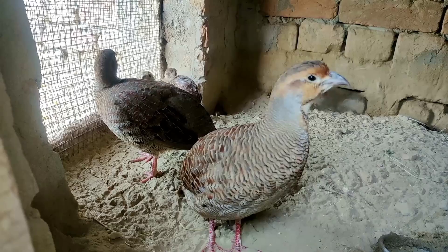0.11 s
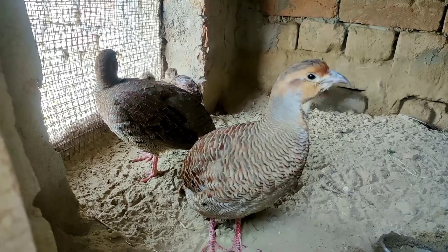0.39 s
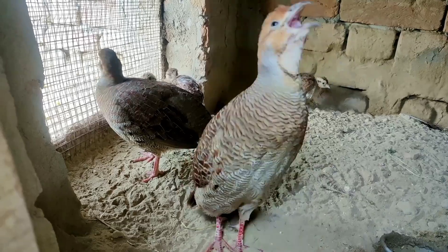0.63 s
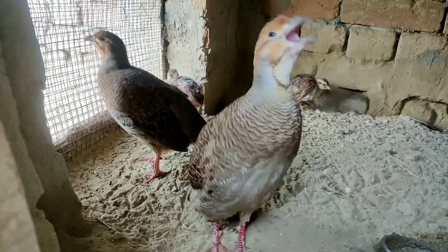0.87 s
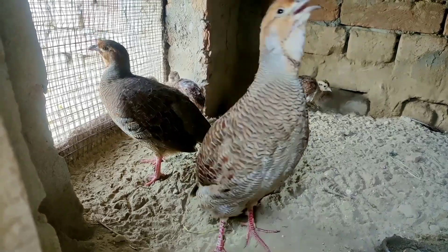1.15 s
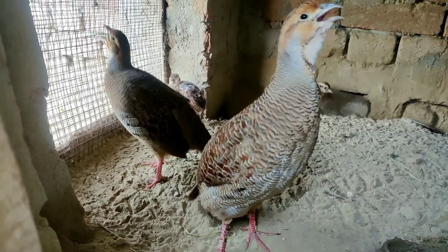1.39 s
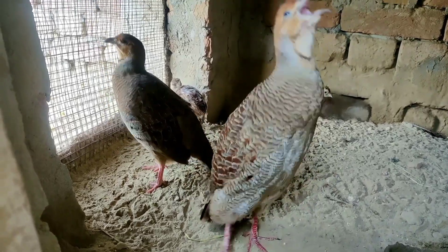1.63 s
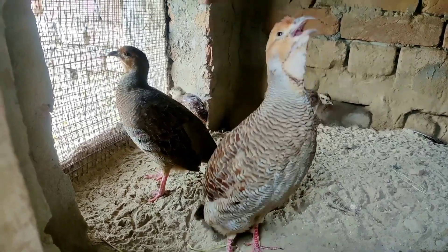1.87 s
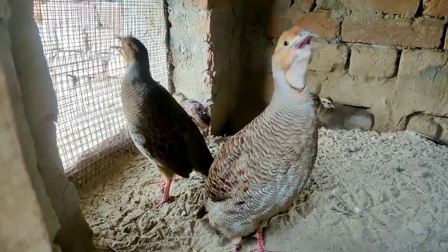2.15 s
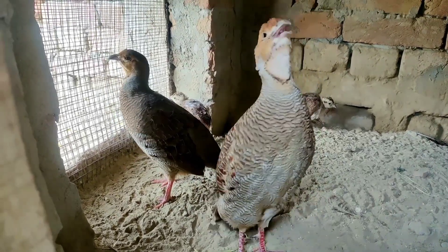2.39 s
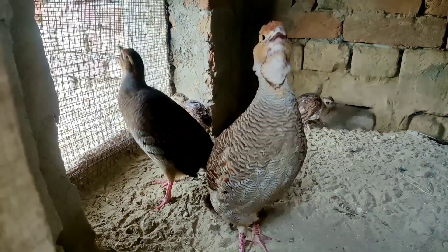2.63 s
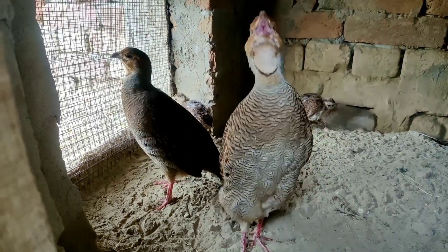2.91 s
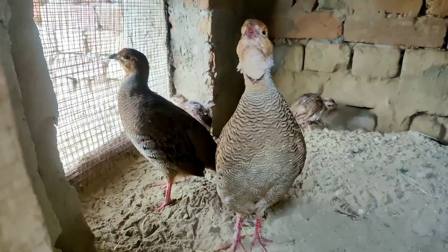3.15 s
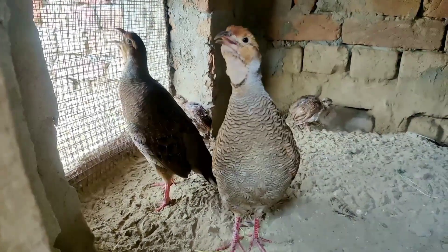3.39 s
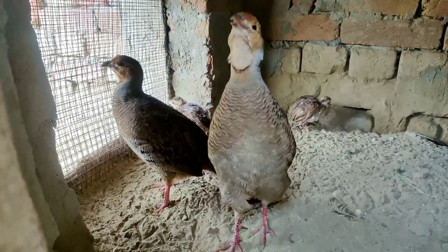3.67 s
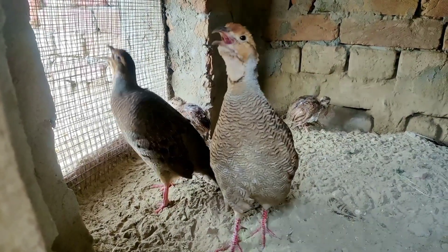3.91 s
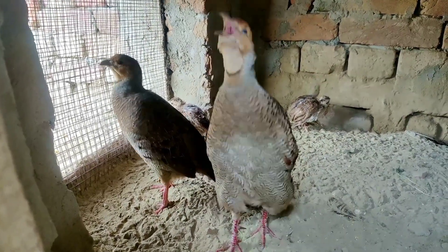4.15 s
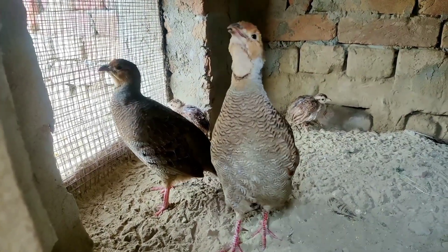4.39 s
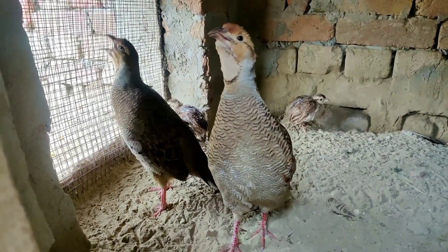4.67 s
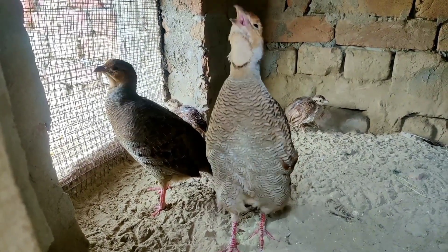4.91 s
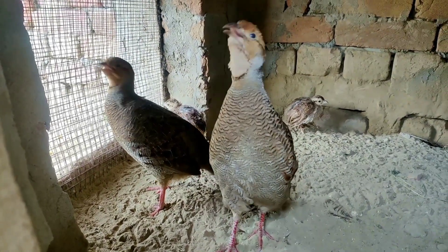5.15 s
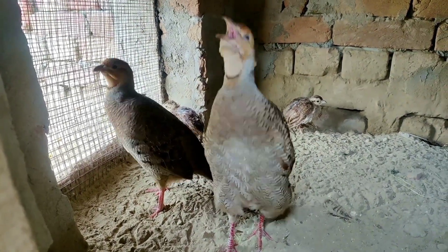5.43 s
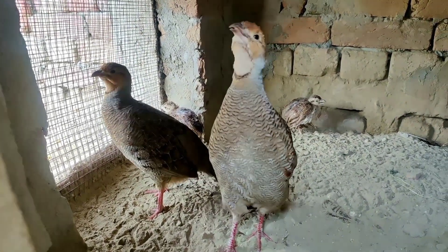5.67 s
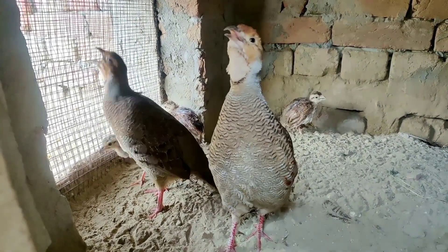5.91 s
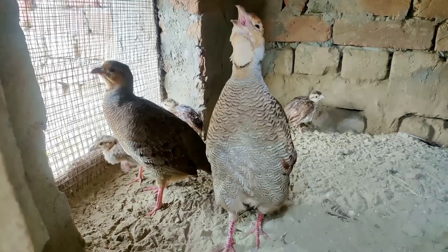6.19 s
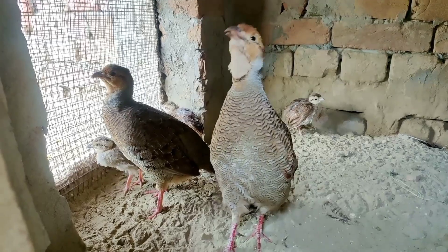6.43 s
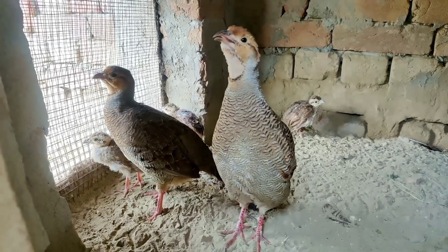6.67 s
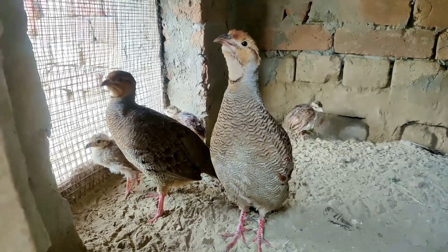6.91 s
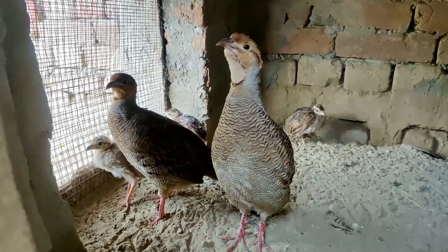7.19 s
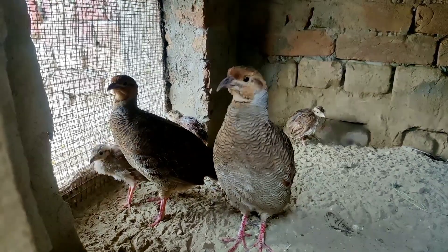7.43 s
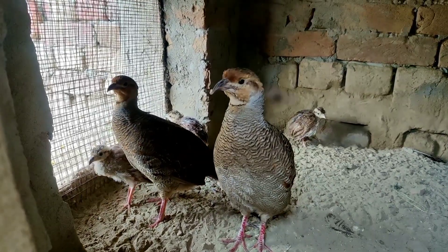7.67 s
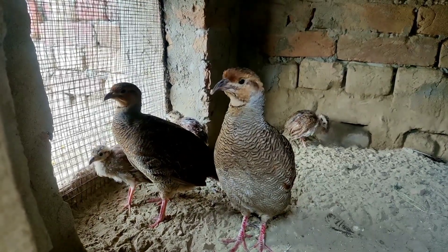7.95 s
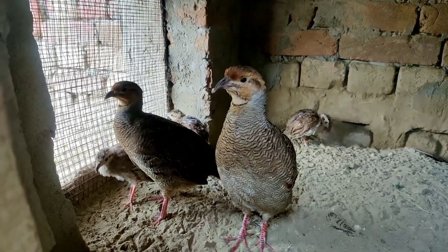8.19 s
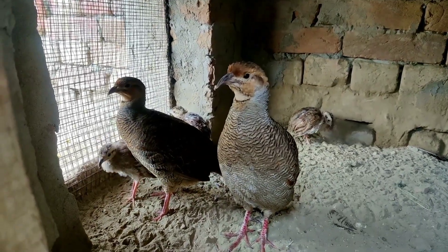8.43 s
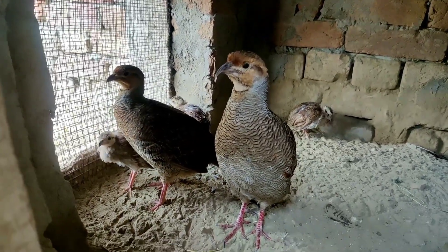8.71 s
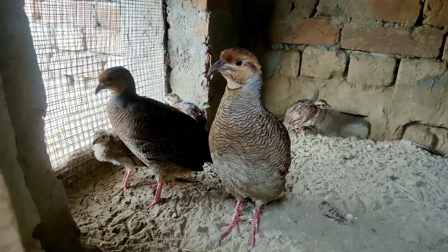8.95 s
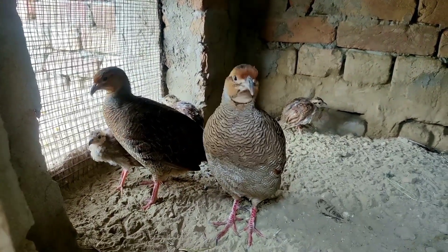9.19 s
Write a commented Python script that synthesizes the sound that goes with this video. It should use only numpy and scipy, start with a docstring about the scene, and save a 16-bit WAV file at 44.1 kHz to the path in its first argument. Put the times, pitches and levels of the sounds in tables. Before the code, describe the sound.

A faint peep and sandy scuff over low hum, then a rough squeal launches two partridge-like birds into a loud, close duet. Raspy double clucks, a thin steady whistle and a harsh two-part yelp cycle about every two-thirds of a second. They stop abruptly before seven seconds; quiet hum, weak peeps, foot knocks and a distant bleat remain. Small brick pen, short hard echo, close microphone.

```python
"""Two game birds duet close by in a brick pen: one clucks, the other squeals, whistles and yelps. Each voice is
gliding sines with overtones or a stack of partials; chaotic pulses and breath make the rasp that locks into tones.
Peeps (one early, the rest late) are gliding sines, feet are decaying sines and filtered noise, a far animal's
bleat is a quavering stack of partials, low thumps under the yelps are filtered gates. A machine's hum and low
rumble sink under the calls, then creep back."""
import sys
import numpy as np
from scipy import signal
from scipy.fft import rfft, irfft, next_fast_len
from scipy.io import wavfile
from scipy.ndimage import uniform_filter1d, map_coordinates

SR = 44100
rng = np.random.default_rng(int(sys.argv[2]) if len(sys.argv) > 2 else 0)


def store_pcm(level_fs):
    """Save levels as 16-bit WAV."""
    pcm = np.round(np.clip(level_fs, -1, 1) * 32767).astype(np.int16)
    wavfile.write(sys.argv[1], SR, np.atleast_2d(pcm).T)


def gain_from_db(level_db):
    """Turn a decibel level (scalar or array-like) into a linear amplitude factor."""
    decades = np.asarray(level_db, float) / 20
    return 10 ** decades


N = 411012


def unit(x):
    """Scales to rms 1."""
    return x / np.sqrt(np.mean(x ** 2) + 1e-20)


def along(points, hz):
    """Interpolates (f/Hz, value) points on a log frequency axis."""
    f, v = np.transpose(points)
    return np.interp(np.log(hz + 1), np.log(f + 1), v)


def wobble(rate_hz):
    """Smooth random curve, rate_hz knots a second."""
    return map_coordinates(rng.standard_normal(int(N * rate_hz / SR) + 4), [np.arange(N) * rate_hz / SR])


def filtered(x, response):
    """Multiplies the spectrum by a complex response of frequency."""
    m = next_fast_len(N + 8192)
    return irfft(rfft(x, m) * response(np.fft.rfftfreq(m, 1 / SR)), m)[..., :N]


def throat(modes):
    """Causal sum of resonances of alternating sign; modes: f/Hz, width/Hz, level/dB."""
    def response(f):
        total = 0
        for k, (center, width, db) in enumerate(modes):
            total = total + (-1) ** k * gain_from_db(db) * 1j * f * width / (center * center - f * f + 1j * f * width)
        return total
    return response


def gate(rows, lead_s, lag_s, edge_s):
    """1 while the rows (t/s, length/s, ..) sound, with soft edges."""
    on = np.zeros(N)
    for s, length, *_ in rows:
        on[round((s - lead_s) * SR):round((s + length + lag_s) * SR)] = 1
    return uniform_filter1d(on, max(int(edge_s * SR), 1))


# the pen throws each pitch to one side: f/Hz, left over right/dB
LEAN = [(1420, 5), (1650, -3.5), (1760, -13), (2070, -14), (2330, -6.5)]
# as the birds turn: t/s, share of the lean, left over right/dB
FACING = [(.5, .2, -1), (1.701, 0.27, -1), (2.3, 0.89, -1), (4, 1, 4), (6.2, 0.8, 4.5), (6.6, .4, -0.5)]


def tones(rows, over_db, attack_s, release_s, bend, jitter_hz, swell_db, fade_db):
    """Gliding sines with overtones (t/s, length/s, start f/Hz, end f/Hz, level/dB); the first partial leans sideways."""
    out, shake_hz = np.zeros((2, N)), jitter_hz * wobble(300)
    flicker = np.array([wobble(70), wobble(70)])
    when, share, side_db = np.transpose(FACING)
    for s, length, start_hz, end_hz, db in rows:
        t = np.arange(-attack_s, length + 4 * release_s, 1 / SR)
        i = round((s - attack_s) * SR) + np.arange(len(t))
        hz = start_hz + (end_hz - start_hz) * np.clip(t / length, 0, 1.3) ** bend
        phase = 2 * np.pi * np.cumsum(hz + shake_hz[i]) / SR
        shape = np.clip((t + attack_s) / (2 * attack_s), 0, 1) ** 2
        shape *= np.exp(-np.maximum(t - length + release_s, 0) / release_s)
        shape *= gain_from_db(-swell_db * np.exp(-np.maximum(t, 0) / 0.053))  # positive: grows while held
        # positive fade_db: overtones thin out as the pitch falls, the high ones most
        fade_by_db = fade_db * (start_hz - hz) / 400
        draw = rng.standard_normal((len(over_db) + 1, 4))
        ratio = gain_from_db(along(LEAN, hz) * np.interp(s, when, share) + np.interp(s, when, side_db))
        sides = np.array([ratio, ratio ** 0]) * np.sqrt(2 / (1 + ratio ** 2))
        wave = sides * np.sin(phase + [[-.5], [.5]])  # right leads in phase
        for k, level_db in enumerate(over_db):
            overtone_db = level_db - (k + 1) * fade_by_db + 2 * flicker[:, i] + 3 * draw[k + 1, :2, None]
            wave += gain_from_db(overtone_db) * np.sin((k + 2) * phase + np.pi * draw[k + 1, 2:, None])
        out[:, i] += gain_from_db(db) * np.sqrt(2) * shape * wave
    return out


# resonances that lift nearby partials: f/Hz, width/Hz; the upper one also level/dB
RING = (1700, 300)
UPPER_RING = (5300, 1100, 7.7)
QUAVER_HZ = 74


def stack(curve, partial_db, jitter_hz, rough, breath_db, breath_hz, ring_db, tremble):
    """Harmonic voice on a pitch curve, with random flutter, breath and a fast quaver of pitch and level."""
    s, hz, db = np.transpose(curve)
    t = np.arange(N) / SR
    pitch_hz = np.interp(t, s, hz)
    quaver = np.sin(2 * np.pi * QUAVER_HZ * t + wobble(20))
    phase = 2 * np.pi * np.cumsum(pitch_hz * (1 + tremble * quaver) + jitter_hz * wobble(150)) / SR
    clean = np.zeros(N)
    for number, level_db in enumerate(partial_db, 1):
        f = number * pitch_hz
        lift_db = ring_db * np.exp(-((f - RING[0]) / RING[1]) ** 2)
        lift_db += UPPER_RING[2] * np.exp(-((f - UPPER_RING[0]) / UPPER_RING[1]) ** 2)
        clean += gain_from_db(level_db + lift_db) / (1 + (f / 7900) ** 20) * np.sin(number * phase)
    flutter = np.array([wobble(980), wobble(900)])
    voiced = unit(clean) * (1 + rough * flutter) * (1 + 4 * tremble * quaver)
    noise = rng.standard_normal((2, N))
    breath = unit(filtered(noise, lambda f: f / (f + 2500) / (1 + (f / breath_hz) ** 4)))
    return (voiced + gain_from_db(breath_db) * breath) * gain_from_db(np.interp(t, s, db, -120, -120))


# background: t/s, level/dB
GROUND = [(.45, -42.5), (1.05, -55), (6.5, -60), (8.91, -51.5), (9.3, -48.5)]
# spectrum of rumble and hiss: f/Hz, relative level/dB per Hz
AIR = [(25, -5), (55, -15), (80, -21), (400, -25.5), (1000, -40.5), (3000, -44.5), (15000, -64.5)]
# hum partials: f/Hz, level/dB
HUM = [(43, 0), (129, -10), (254, -12)]
# f/Hz, left-right likeness
ALIKE = [(240, 0.93), (2000, 0.24)]


def background():
    """Shaped noise for rumble and hiss, wavering sines for the hum, on one level curve."""
    now = np.arange(N) / SR

    def spread(hz):
        angle = np.arccos(np.clip(along(ALIKE, hz), -1, 1)) / 2
        return gain_from_db(along(AIR, hz)) * [np.cos(angle), np.sin(angle)]
    mid, side = filtered(rng.standard_normal((2, N)), spread)
    hum = np.zeros(N)
    for hz, db in HUM:
        hum += gain_from_db(db + 2.2 * wobble(6.1)) * np.sin(2 * np.pi * hz * now + 0.41 * wobble(22.0))
    level = gain_from_db(np.interp(now, *np.transpose(GROUND)) + 2.2 * wobble(18.0))
    return level * (gain_from_db(2.0) * unit(np.array([mid + side, mid - side])) + hum)


# t/s, length/s, start f/Hz, end f/Hz, level/dB
PEEPS = [(7.865, 0.037, 2597, 2300, -67), (8.215, 0.06, 6500, 4570, -71), (8.33, .03, 6900, 6000, -66),
         (.145, .06, 5200, 3400, -56), (8.872, .018, 3250, 3000, -68)]


def chicks():
    """Peeps: short falling sines without overtones."""
    return tones(PEEPS, [], attack_s=.004, release_s=.005, bend=0.88, jitter_hz=90, swell_db=0.5, fade_db=0)


# middle t/s, length/s, level/dB
SCUFFS = [(0.186, 0.066, -58), (8.381, .07, -57.5), (8.696, 0.085, -65)]


def scuffs():
    """Feet in sand: resonant grainy noise under smooth humps."""
    now = np.arange(N) / SR
    grains = rng.standard_normal((2, N)) * gain_from_db(1.1 * wobble(260))
    sand = unit(filtered(grains, lambda f: throat([(2800, 3500, 0)])(f) ** 2))
    return sand * sum(gain_from_db(db) * np.exp(-(2 * (now - s) / length) ** 4) for s, length, db in SCUFFS)


# t/s, pitch f/Hz, level/dB
SQUEAL = [(0.224, 1040, -35.5), (0.273, 1369, -15.5), (0.332, 1158, -20), (0.365, 1282, -15),
          (0.372, 1725, -16), (0.384, 1887, -13), (.397, 1643, -15), (0.403, 1200, -19), (.43, 643, -35.5)]
# partials 1, 2, ..: level/dB
SQUEAL_DB = [-22.5, -9.5, -9.5, -9, -10, -10.5]


def squeal():
    """One harmonic voice that leaps in pitch, slightly rough and breathy."""
    return stack(SQUEAL, SQUEAL_DB, jitter_hz=11, rough=0.15, breath_db=-14.5, breath_hz=14000,
                 ring_db=12.0, tremble=0)


# rasps with no cluck or yelp of their own: t/s, level/dB
RASPS = [(0.392, -28), (0.677, -27.5)]
CLUCK_RASP_DB, HOARSE = -18, .5  # under the tone; dB of rasp gained per dB a cluck falls under -10.5
CLUCK_OPENS_DB, YELP_OPENS_DB = -15, 6  # a cluck's rasp opens soft and grows, a yelp's bursts and settles


def rasp_openings():
    """Rasp of every syllable in time order: t/s, level/dB, first level over that/dB."""
    own = [(s, db, 0) for s, db in RASPS]
    yelping = [(s, db, YELP_OPENS_DB) for s, _, db, *_ in YELPS]
    clucking = [(s, db + CLUCK_RASP_DB + HOARSE * max(-10.5 - db, 0), CLUCK_OPENS_DB) for s, _, db, _ in CLUCKS]
    return sorted(own + yelping + clucking)


CLUCK_OPENING_S, YELP_OPENING_S = 0.009, 0.031
CLUCK_HUSH_DB, YELP_HUSH_DB, WHISTLE_HUSH_DB = -11, -15, -24


def rasp_level(clucks, whistles, holds, glides, breaks):
    """Envelope of the rasp: swells at each opening, outlasts the last tone, is hushed while a tone is locked."""
    level = np.zeros(N)
    yelps, openings = holds + glides, rasp_openings()
    ends = [row[0] + row[1] for row in [*clucks, *whistles, *yelps, *breaks]]
    ends = np.array(ends + [SQUEAL[-1][0]])
    for (s, db, opens_db), (following, *_) in zip(openings, [*openings[1:], (N / SR,)]):
        length = ends[ends < following].max() - s + 0.00046
        t = np.arange(0, length + 0.047, 1 / SR)
        opening_s = YELP_OPENING_S if opens_db > 0 else CLUCK_OPENING_S
        swell = (1 - np.exp(-t / 0.0058)) * gain_from_db(opens_db * np.exp(-t / opening_s))
        swell *= np.exp(-np.maximum(t - length, 0) / 0.0026)
        level[round(s * SR):][:len(t)] += swell * gain_from_db(db - 3 * t / length)
    hush_db = WHISTLE_HUSH_DB * gate(whistles, -0.0072, -0.0023, 0.0017)
    hush_db += YELP_HUSH_DB * gate(yelps, 0, -0.0083, 0.0043)
    hush_db += CLUCK_HUSH_DB * gate(clucks, 0, -0.0015, 0.0093)
    releases = [(s + length - .004, .016) for s, length, *_ in whistles]
    pauses = [(s + length + 0.0053, .017) for s, length, *_ in holds]  # before a glide
    return level * gain_from_db(hush_db + 2.1 * gate(releases, 0, 0, 0.0032) - 7 * gate(pauses, 0, 0, 0.0047))


# resonances: f/Hz, width/Hz, level/dB
CLUCK_THROAT = [(968, 220, -9), (1798, 760, 4), (2967, 880, -2), (5140, 1400, -1)]
YELP_THROAT = [(1082, 560, -11.5), (2110, 610, 6), (3000, 1100, 2.5), (4884, 1300, 3), (12400, 3000, -8.5)]
CLUCK_FLAP_HZ, YELP_FLAP_HZ = 820, 1050  # mean pulse rates
RASP_TOP_HZ, RASP_TREBLE_DB = 6300, -3  # the rasp thins out above this


def rasp(clucks, whistles, holds, glides, breaks):
    """Chaotic flapping of the voice: pulses on a shaking pitch plus breath, through two throats."""
    level = rasp_level(clucks, whistles, holds, glides, breaks)
    clucking = gate(clucks, .045, 0.11, .01)
    rate_hz = YELP_FLAP_HZ + (CLUCK_FLAP_HZ - YELP_FLAP_HZ) * clucking
    phase = 2 * np.pi * np.cumsum(rate_hz * (1 + .12 * wobble(200))) / SR
    flaps = np.exp((4200 / rate_hz) ** 2 * (np.cos(phase) - 1)) * gain_from_db(3 * wobble(400))
    breath = .7 * rng.standard_normal((2, N)) * gain_from_db(3 * wobble(300))
    source = unit(flaps - uniform_filter1d(flaps, size=300)) + breath
    source = filtered(source, lambda f: gain_from_db(RASP_TREBLE_DB / (1 + (RASP_TOP_HZ / (f + 1)) ** 24)))
    cluck = unit(filtered(source, throat(CLUCK_THROAT))) * gain_from_db(8.0) * clucking
    yelp = unit(filtered(source, throat(YELP_THROAT))) * gain_from_db(3.5) * (1 - clucking)
    return level * gain_from_db(2 * wobble(90)) * (cluck + yelp)


# t/s, length/s, start f/Hz, end f/Hz, level/dB
CROAK = [(.402, 0.025, 1308, 436.6, -26)]


def croak():
    """Low end of the squeal: a steep, heavily shaken glide."""
    return tones(CROAK, [-4, -8], attack_s=0.0034, release_s=0.005, bend=.8, jitter_hz=260,
                 swell_db=0.5, fade_db=1)


# rasp t/s, held f/Hz, rasp level/dB, held level/dB, glide level/dB, glide length/s
YELPS = [(0.49, 2001, -17, -3.5, -4, 0.063), (0.85, 2043, -23.5, -10.5, -9, 0.018),
         (1.55, 2051, -25, -8.5, -8, 0.03), (2.182, 2047, -27, -9, -7.5, 0.033),
         (2.808, 2042, -28.5, -10, -9, 0.036), (3.451, 2077, -30, -8.5, -8.5, 0.037),
         (4.094, 2064, -30.5, -8.5, -10, 0.062), (4.743, 2060, -28, -10, -10, 0.064),
         (5.397, 2056, -28.5, -9.5, -9.5, 0.066), (6.05, 2053, -27.5, -10, -10, 0.065)]
YELP_LOCK_S, HOLD_S, GLIDE_AFTER_S = .043, .027, .059  # rasp before the held note, its length, held start to glide
GLIDE_OVER_HZ, GLIDE_FALL_HZ, GLIDE_CURVE = 74.3, 408.5, 1.5  # start over held note, full fall, growth with length
GLIDE_FULL_S, YELP_CRACK_DB = .06, -2  # crack level under the glide
DROP_AFTER_S, DROP_S, DROP_HZ, DROP_END_HZ, DROP_DB = 0.017, 0.0072, 1703, 1540, -3  # level under the glide


def yelp_rows():
    """Held notes, glides and breaks; a cracked yelp falls back low."""
    holds, glides = [], []
    for s, hz, _, held_db, glide_db, length in YELPS:
        locked_s, top_hz = s + YELP_LOCK_S, hz + GLIDE_OVER_HZ
        end_hz = top_hz - GLIDE_FALL_HZ * (length / GLIDE_FULL_S) ** GLIDE_CURVE
        holds.append((locked_s, HOLD_S, hz, hz, held_db))
        glides.append((locked_s + GLIDE_AFTER_S, length, top_hz, end_hz, glide_db))
    cracked = cracks(glides, GLIDE_FULL_S, YELP_CRACK_DB)
    drops = [(s + DROP_AFTER_S, DROP_S, DROP_HZ, DROP_END_HZ, db - YELP_CRACK_DB + DROP_DB)
             for s, _, _, _, db in cracked]
    return holds, glides, cracked + drops


# overtones 2, 3, ..: level under the first/dB
YELP_DB = [-10.5, -15, -28.5, -25.5, -27.5, -24.5]


def yelp_tones(yelps):
    """Locked voice of the yelps: held notes and falling glides rich in overtones."""
    return tones(yelps, YELP_DB, attack_s=0.0019, release_s=0.0046, bend=1.6, jitter_hz=8,
                 swell_db=0.0, fade_db=9.0)


# low thump under a yelp: t/s, level/dB
THUMP_DB = [(0.55, -28), (1.602, -35), (2.3, -24), (3.6, -28), (4.2, -34), (6.2, -38)]


def thumps(yelps):
    """Low thump under each locked yelp, stronger on the right, slightly uneven."""
    noise = rng.standard_normal((2, N))
    uneven = unit(filtered(noise, lambda f: 1 / (1 + 1j * f / 40) / (1 + 1j * f / 250)))
    offset = (np.array([[.3], [1.2]]) + .5 * uneven) * gate(yelps, 0, 0, 0.0094)
    level = gain_from_db(np.interp(np.arange(N) / SR, *np.transpose(THUMP_DB)))
    return filtered(level * offset, lambda f: 1j * f / (8 + 1j * f))


# t/s, end f/Hz
WHISTLES = [(0.725, 2386), (1.429, 2358), (2.044, 2356), (2.667, 2347), (3.305, 2342), (3.949, 2346),
            (4.593, 2332), (5.245, 2318), (5.911, 2328)]
WHISTLE_S, WHISTLE_SAG, WHISTLE_LEVEL_DB = 0.081, 1.004, -15  # sag: start over end pitch


def whistle_rows():
    """Whistles spelt out as barely falling tones."""
    return [(s, WHISTLE_S, hz * WHISTLE_SAG, hz, WHISTLE_LEVEL_DB) for s, hz in WHISTLES]


# overtones 2, 3, ..: level under the first/dB
WHISTLE_DB = [-20.5, -23, -34.5, -39]


def whistle_tones(whistles):
    """Steady, nearly pure tones with weak overtones."""
    return tones(whistles, WHISTLE_DB, attack_s=0.0027, release_s=0.0018, bend=1.0, jitter_hz=2.8,
                 swell_db=-2.0, fade_db=-2.0)


# rasp t/s, start f/Hz, level/dB, tone length/s
CLUCKS = [(1.091, 1598, -11, 0.017), (1.227, 1608, -11, 0.033), (1.369, 1573, -8, 0.032),
          (1.832, 1695, -8.5, 0.019), (1.977, 1660, -9, 0.026), (2.471, 1752, -9.5, 0.026),
          (2.613, 1678, -9, 0.025), (3.103, 1744, -10.5, 0.027), (3.248, 1699, -9.5, 0.034),
          (3.746, 1703, -12, 0.027), (3.891, 1652, -10, 0.033), (4.39, 1720, -13, 0.038),
          (4.537, 1600, -10.5, 0.032), (5.04, 1685, -12.5, 0.0374), (5.189, 1594, -10, 0.029),
          (5.693, 1629, -11.5, 0.034), (5.839, 1609, -13.5, 0.035), (6.346, 1613, -11, 0.035),
          (6.489, 1548, -15.5, 0.035), (6.649, 1448, -30, 0.034)]
CLUCK_LOCK_S, CLUCK_FULL_S, CLUCK_CRACK_DB = 0.031, .035, -11  # rasp before the tone; crack level under the tone
CLUCK_FALL_HZ, CLUCK_CURVE = 217.5, 2.4  # fall of a full cluck, growth with length


def cluck_rows():
    """Falling cluck tones and the cracks of those cut short."""
    rows = []
    for s, hz, db, length in CLUCKS:
        end_hz = hz - CLUCK_FALL_HZ * (length / CLUCK_FULL_S) ** CLUCK_CURVE
        rows.append((s + CLUCK_LOCK_S, length, hz, end_hz, db))
    return rows, cracks(rows, CLUCK_FULL_S, CLUCK_CRACK_DB)


# overtones 2, 3, ..: level under the first/dB
CLUCK_DB = [-21.5, -23.5, -30]
RUN_UP_S, RUN_UP, RUN_UP_DB = .024, 1.24, -2  # length, top over locked pitch, level under the tone


def cluck_tones(clucks):
    """Locked cluck tones, each after a run-up in which the voice shakes upward."""
    locked = tones(clucks, CLUCK_DB, attack_s=0.002, release_s=0.0072, bend=1.3, jitter_hz=14,
                   swell_db=1.5, fade_db=4.5)
    rows = [(s - RUN_UP_S, RUN_UP_S, hz, RUN_UP * hz, db + RUN_UP_DB) for s, _, hz, _, db in clucks]
    run_ups = tones(rows, [-14, -9], attack_s=.003, release_s=.002, bend=0.96, jitter_hz=210,
                    swell_db=15.5, fade_db=-2.5)
    return locked + gain_from_db(4 * wobble(220)) * run_ups


CUT_SHORT = .78  # a tone under this share of its full length cracks
CRACK_UP, CRACK_S, CRACK_SAG = 1.27, 0.02, .92  # jump in pitch, length, end over start pitch


def cracks(rows, full_s, under_db):
    """A tone cut short jumps up and sags."""
    return [(s + length, CRACK_S, CRACK_UP * end_hz, CRACK_UP * CRACK_SAG * end_hz, db + under_db)
            for s, length, _, end_hz, db in rows if length < CUT_SHORT * full_s]


# overtones 2, 3: level under the first/dB
CRACK_DB = [-6.5, -33]


def break_tones(breaks):
    """Cracks and low drops: short tones that fall late."""
    return tones(breaks, CRACK_DB, attack_s=.002, release_s=0.0022, bend=3.8, jitter_hz=22,
                 swell_db=5.0, fade_db=5.5)


# t/s, level/dB, f/Hz
KNOCKS = [(7.919, -40, 237), (8.11, -46, 226), (8.705, -48, 536)]


def knocks():
    """Feet on hollow ground: low sines that decay 60 dB in 0.18 s."""
    out, t = np.zeros(N), np.arange(SR // 8) / SR
    for s, db, hz in KNOCKS:
        thud = gain_from_db(db - 60 * t / 0.18) * (1 - np.exp(-t / 0.0029)) * np.sin(2 * np.pi * hz * t)
        out[round(s * SR):][:len(t)] += thud
    return out


# t/s, pitch f/Hz, level/dB
BLEAT = [(8.98, 270.6, -62), (9.01, 297, -50), (9.06, 315, -49), (9.2, 289, -48.5), (9.265, 282, -55),
         (9.29, 270, -64)]
# partials 1, 2, ..: level/dB
BLEAT_DB = [-27, -26.5, -5, -17, -12, 5, -6.5, -3, -19.5, -15, -17.5]


def far_bleat():
    """A far animal: low harmonic voice with a fast quaver."""
    return stack(BLEAT, BLEAT_DB, jitter_hz=5, rough=.22, breath_db=-12, breath_hz=7000, ring_db=2, tremble=.04)


def pen(x):
    """Short ring of the brick walls and a faint long yard tail, as decaying noise."""
    t = np.arange(SR // 3) / SR
    tail = rng.standard_normal((2, len(t))) * (gain_from_db(-30 - 60 * t / 0.08) + gain_from_db(-74.5 - 60 * t / 0.75))
    tail[:, 0] = 1  # direct sound
    return signal.fftconvolve(x, tail, axes=1)[:, :N]


def scene():
    """Voices ring in the pen; thumps, feet and background are added dry."""
    clucks, cluck_breaks = cluck_rows()
    whistles = whistle_rows()
    holds, glides, yelp_breaks = yelp_rows()
    yelps, breaks = holds + glides, cluck_breaks + yelp_breaks
    birds = squeal() + rasp(clucks, whistles, holds, glides, breaks) + croak()
    birds += yelp_tones(yelps) + whistle_tones(whistles) + cluck_tones(clucks) + break_tones(breaks)
    feet = scuffs() + knocks()
    return pen(birds + chicks() + far_bleat()) + thumps(yelps) + feet + background()


def roll_off(x):
    """The treble ends steeply here."""
    return signal.sosfilt(signal.butter(12, 16480, fs=SR, output="sos"), x)


def record(dry):
    """Treble roll-off, soft clipping near full scale, 24 ms of silence at the start."""
    dry = filtered(dry, lambda f: 1 / (1 + (f / 15400) ** 40))
    soft = dry / (1 + np.abs(dry / .93) ** 6) ** (1 / 6)
    mix = soft * (np.arange(N) > .024 * SR)
    return roll_off(mix)


dry = scene()
out = record(dry)
store_pcm(out)
```